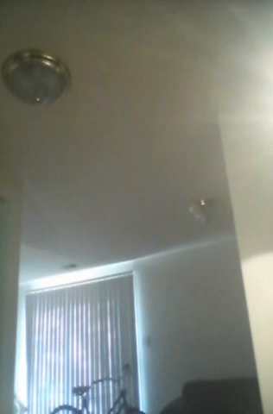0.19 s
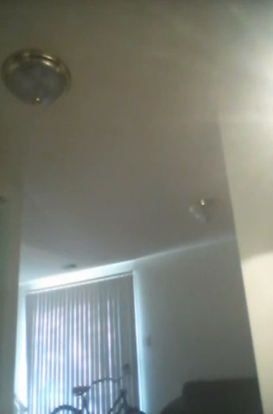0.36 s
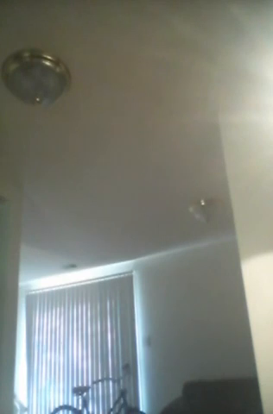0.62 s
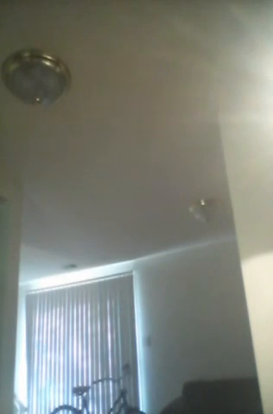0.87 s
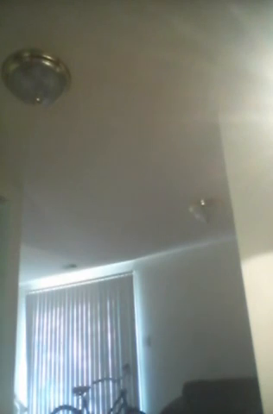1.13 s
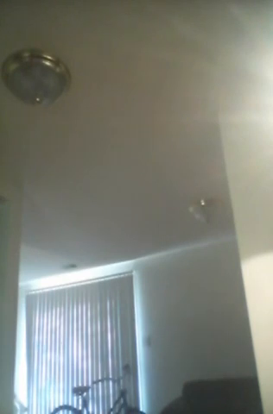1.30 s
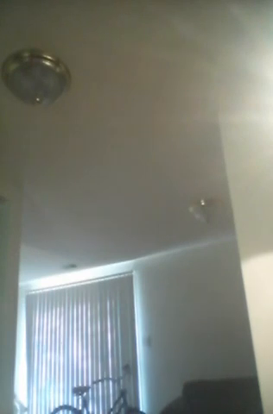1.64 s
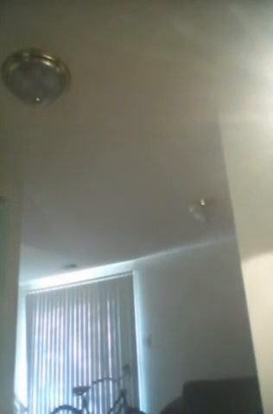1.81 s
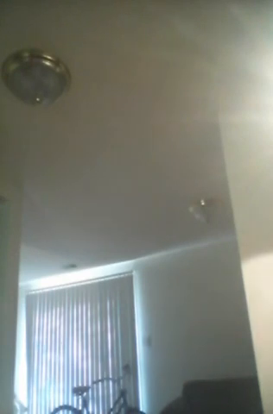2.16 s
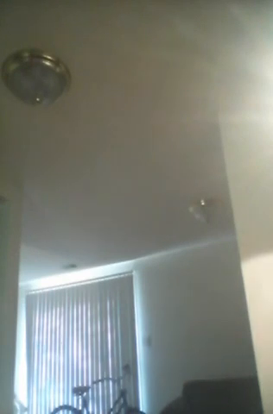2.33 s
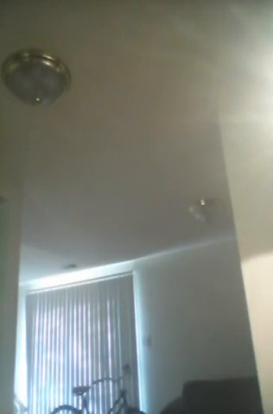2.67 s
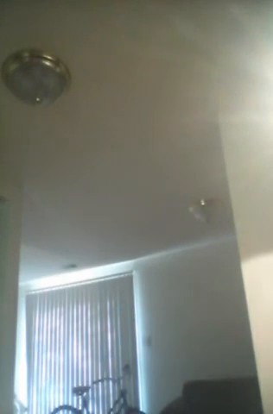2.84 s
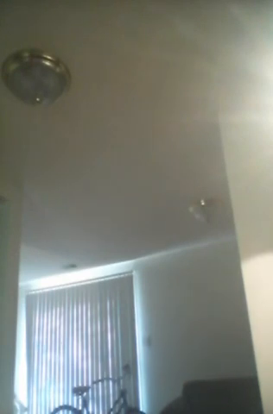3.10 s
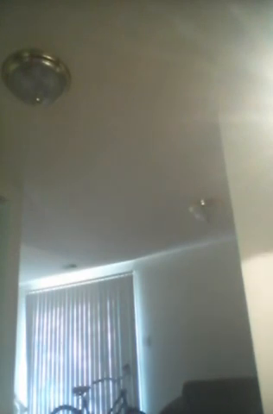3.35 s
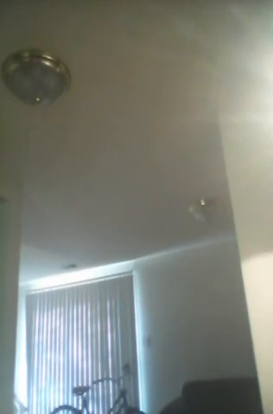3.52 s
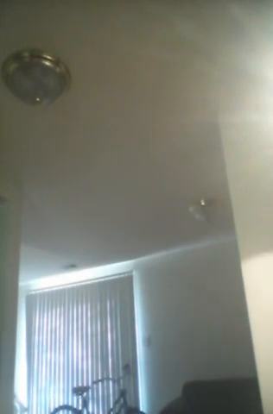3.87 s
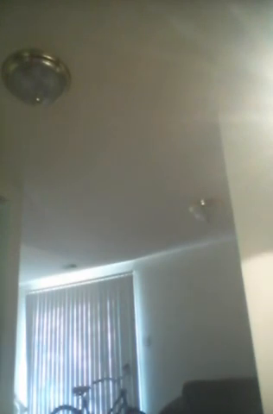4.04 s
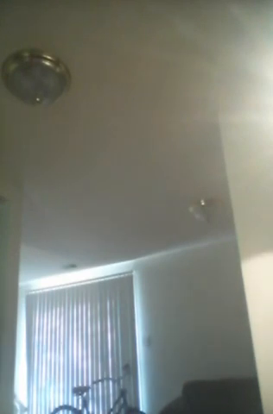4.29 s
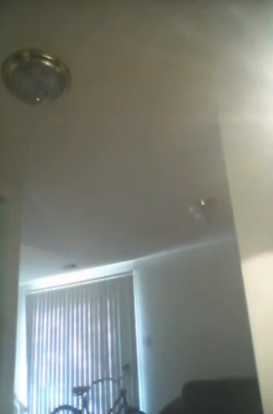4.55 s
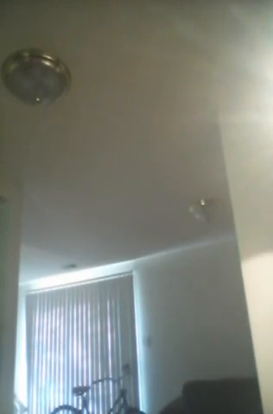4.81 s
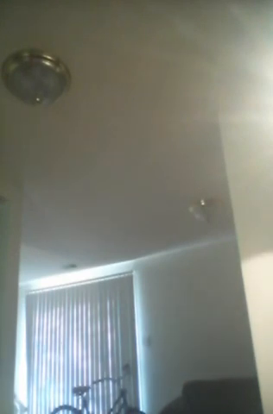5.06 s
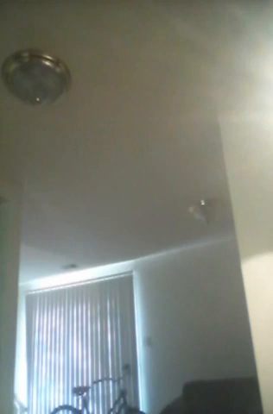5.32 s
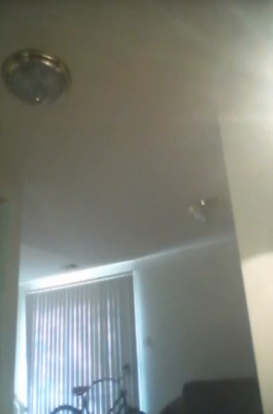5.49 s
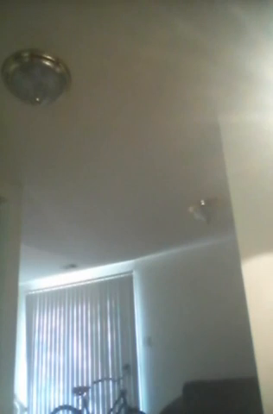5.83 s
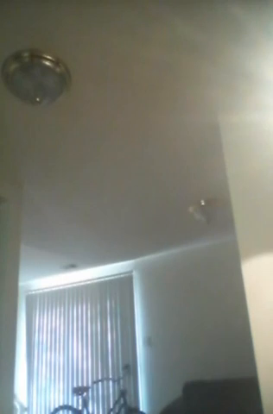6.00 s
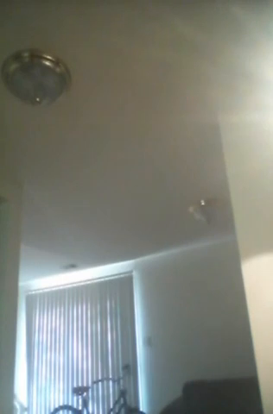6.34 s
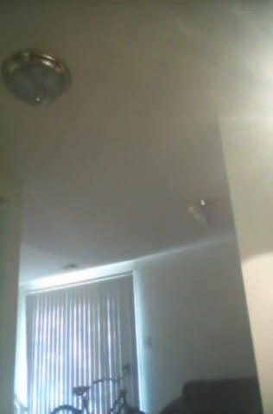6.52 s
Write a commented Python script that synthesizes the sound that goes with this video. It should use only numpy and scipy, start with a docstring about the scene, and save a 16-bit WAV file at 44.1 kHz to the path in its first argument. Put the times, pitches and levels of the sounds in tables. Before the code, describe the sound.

A microwave oven hums low and steady with fan whir and airy vent noise, while counter clicks lead to a loud double-edged thump past four seconds.

```python
"""A microwave oven hums on multiples of the mains, its fan whirs and air blows through the vent.
Small things click on the counter as filtered noise bursts; heavy thumps ring a cabinet's panel modes.
The hum and whir are wavering sines, the air and hiss are coloured noise; all sink and swell slowly.
Clicks and thumps carry a short kitchen tail, and a faint patchy high noise follows the loudness of the whole."""
import sys
import numpy as np
from scipy import signal
from scipy.fft import rfft, irfft, next_fast_len
from scipy.io import wavfile
from scipy.ndimage import uniform_filter1d, map_coordinates

SR = 44100
rng = np.random.default_rng(int(sys.argv[2]) if len(sys.argv) > 2 else 0)


def file_out(sig):
    """Save sig as 16-bit WAV at sys.argv[1]."""
    # one column per channel
    cols = np.atleast_2d(sig).T
    # limit, then scale
    lim = np.clip(cols, -1, 1)
    pcm = np.round(lim * 32767).astype(np.int16)
    wavfile.write(sys.argv[1], SR, pcm)


N = 293706
T = np.arange(N) / SR  # seconds


def amp(db):
    """Decibels to gain."""
    return 10 ** (np.asarray(db) / 20)


def unit(x):
    """Scale x to rms 1."""
    return x / np.sqrt(np.mean(x ** 2) + 1e-20)


def along(points, hz):
    """Read a curve of (Hz, value) points on a log frequency axis."""
    f, v = np.transpose(points)
    return np.interp(np.log(hz + 1), np.log(f + 1), v)


def columns(rows):
    """One value per sample for each column after the time."""
    s, *cols = np.transpose(rows)
    return [np.interp(T, s, c) for c in cols]


def wobble(rate):
    """A smooth random curve with rate knots a second."""
    knots = rng.standard_normal(int(T[-1] * rate) + 4)
    return map_coordinates(knots, [T * rate])


def filtered(x, response):
    """Multiply the spectrum of x by a complex response of frequency."""
    m = next_fast_len(x.shape[-1] + 8192)
    spectrum = rfft(x, m) * response(np.fft.rfftfreq(m, 1 / SR))
    return irfft(spectrum, m)[..., :x.shape[-1]]


def resonance(f, hz, width_hz):
    """Response of a causal resonance with top gain 1."""
    return 1j * f * width_hz / (hz * hz - f * f + 1j * f * width_hz)


def bump(f, hz, width_hz):
    """Power curve of a resonance, used as a lift in a noise colour."""
    return np.abs(resonance(f, hz, width_hz)) ** 2


def rush(response, patchy_db):
    """Coloured noise of rms 1 whose gain varies in random patches of time and frequency."""
    z = signal.stft(rng.standard_normal(N + 512), nperseg=512)[2]
    field = uniform_filter1d(rng.standard_normal(z.shape), size=5, axis=0)
    field = uniform_filter1d(field, size=8, axis=1)
    patchy = signal.istft(z * amp(patchy_db * unit(field)), nperseg=512)[1][:N]
    return unit(filtered(patchy, response))


def tones(lines, waver_db, drift, rate=2.54):
    """Sines of given (Hz, dB), each wavering in level and by drift radians in phase, rate knots a second."""
    total = 0
    for hz, db in lines:
        level = np.sqrt(2) * amp(db + waver_db * wobble(rate))
        phase = 2 * np.pi * (hz * T + rng.random()) + drift * wobble(rate)
        total = total + level * np.sin(phase)
    return total


def in_kitchen(x, wet_db):
    """A short sound with its room tail: noise in which each frequency dies at its own speed."""
    # Each row: frequency in Hz, time to fall 60 dB in s.
    decay_times = [(100, 0.58), (700, 0.37), (2000, 0.31), (6000, 0.81)]
    hz, t, z = signal.stft(rng.standard_normal(SR // 2), SR, nperseg=256)
    decay = amp(-60 * t / along(decay_times, hz)[:, None])
    tail = signal.istft(z * decay, SR, nperseg=256)[1]
    # the tail starts 150 samples late
    wet = signal.fftconvolve(x, np.pad(tail / np.linalg.norm(tail), (150, 0)))
    return np.pad(x, (0, len(wet) - len(x))) + amp(wet_db) * wet


def add(track, s, x):
    """Lay x on the track at s seconds."""
    part = track[round(s * SR):][:len(x)]
    part += x[:len(part)]


def casing_air(f):
    """Colour of the low rumble of air in the casing."""
    # Spectrum of the rumble. Each row: frequency in Hz, relative level in dB per Hz.
    rumble_colour = [(12, -53.5), (38, -36.5), (60, -22.5), (95, -0.5), (125, 1), (165, 0.5), (210, -10.5),
                     (310, -9), (380, -13), (450, -25.5), (700, -50)]
    return amp(along(rumble_colour, f))


def vent_air():
    """Air through resonances of the duct, rms near 1; the outlet resonance sinks a little with time."""
    # Duct resonances. Each row: frequency in Hz, width in Hz, level in dB relative to the outlet.
    duct_modes = [(590, 300, -20), (1340, 200, -15), (1720, 90, -17)]
    # The loudest duct resonance, high then low. Each row: frequency in Hz, width in Hz.
    outlets = [(946, 148), (910, 137)]
    # Drift to the low outlet. Each row: time in s, its share of the power (0-1).
    settling = [(0, 0.06), (3.4, 0.15), (4.8, 1), (6.66, 0.93)]

    def duct(f):
        return sum(amp(db) * bump(f, hz, w) for hz, w, db in duct_modes)

    high, low = [rush(lambda f: bump(f, hz, w) + duct(f), patchy_db=2.15) for hz, w in outlets]
    share = np.clip(np.interp(T, *np.transpose(settling)), 0, 1)
    return np.sqrt(1 - share) * high + np.sqrt(share) * low


def grille(f):
    """Colour of the hiss: a slope with a few resonant lifts."""
    # Spectrum of the hiss. Each row: frequency in Hz, relative level in dB per Hz.
    slope = [(250, -2), (500, 3.5), (650, -1.5), (1200, -7), (1600, -12.5), (2100, -7.5), (3000, -9.5),
             (3600, -10.5), (6500, -14.5), (8500, -29), (11000, -55.5)]
    # Lifts in the hiss. Each row: frequency in Hz, width in Hz, height in dB relative to the slope.
    lifts = [(1920, 84, 4.5), (2460, 97, -5.5), (2620, 130, -1.5), (2960, 150, -3)]
    return amp(along(slope, f)) * (1 + sum(amp(db) * bump(f, hz, w) for hz, w, db in lifts))


def moving_air():
    """Rumble in the casing, rush in the vent and hiss, three noise layers that sway partly together."""
    # Each row: time in s, then the levels of rumble, vent and hiss in dB before the swaying.
    air_levels = [(0, -46.5, -53, -58), (.6, -47, -57, -61), (1.5, -47.5, -53.5, -60),
                  (2.1, -50.5, -55, -61), (2.9, -47.5, -53, -61), (3.5, -51, -53, -62),
                  (4.0, -52, -58.5, -65.5), (4.9, -49.5, -56.5, -66.5), (5.5, -52.5, -55.5, -65),
                  (5.9, -50, -57, -67.5), (6.2, -52.5, -51.5, -65.5), (6.66, -51.5, -55.5, -62.5)]
    rumble_db, vent_db, hiss_db = columns(air_levels)
    eddies = wobble(8.6)  # swirls of air lift every layer together
    rumble = amp(rumble_db + 1.9 * eddies) * rush(casing_air, patchy_db=3.5)
    vent = amp(vent_db + 0.75 * eddies + 0.65 * wobble(25)) * vent_air()
    hiss = amp(hiss_db + 0.61 * eddies + 1.16 * wobble(35)) * rush(grille, patchy_db=2.1)
    return rumble + vent + hiss


def rotating_parts(hum_db):
    """Fan blades and slower shafts: unsteady sines whose level partly follows the hum."""
    # Fan blade tones. Each row: frequency in Hz, relative level in dB.
    blade_lines = [(157.5, -0.5), (220.2, -14), (315, -20.5), (472.5, -49)]
    # Slow rotating parts. Each row: frequency in Hz, relative level in dB.
    shaft_lines = [(20.2, -3.5), (47.8, -3)]
    # level in dB when the hum is at its reference; dB of change per dB of hum
    whir_ref_db, whir_follows = -50.5, 0.62
    shaft_ref_db, shaft_follows = -59.5, 0.7
    swing_db = hum_db + 40  # the reference hum is -40 dB
    whir = amp(whir_ref_db + whir_follows * swing_db) * tones(blade_lines, waver_db=1.5, drift=0.71)
    shaft = amp(shaft_ref_db + shaft_follows * swing_db) * tones(shaft_lines, waver_db=3.5, drift=0.22)
    return whir + shaft


def transformer(hum_db):
    """Casing hum, core drone and core buzz: sines on whole multiples of the mains frequency."""
    # Casing hum. Each row: multiple of the mains, relative level in dB.
    hum_lines = [(1, -27), (2, -0.5)]
    # Core drone. Each row: multiple of the mains, relative level in dB.
    drone_lines = [(3, -2.5), (4, 0)]
    # Core buzz. Each row: multiple of the mains, relative level in dB.
    buzz_lines = [(5, -15.5), (6, 2)]
    # Upper mains tones. Each row: time in s, drone level in dB, buzz level in dB.
    overtone_levels = [(0, -68, -73.5), (1.0, -69.5, -71.5), (1.6, -60.5, -59.5), (2.5, -52, -62),
                       (3.4, -56, -62), (4.0, -61.5, -68), (5.0, -59.5, -70.5), (5.9, -54.5, -66),
                       (6.66, -56.5, -68)]
    drone_db, buzz_db = columns(overtone_levels)
    mains_hz = 60.03

    def on_mains(lines):
        return [(k * mains_hz, db) for k, db in lines]

    hum = amp(hum_db) * tones(on_mains(hum_lines), waver_db=-1.2, drift=0.055)
    drone = amp(drone_db) * tones(on_mains(drone_lines), waver_db=2.5, drift=0.35, rate=8)
    buzz = amp(buzz_db) * tones(on_mains(buzz_lines), waver_db=2.5, drift=0.35, rate=8)
    return hum + drone + buzz


def oven():
    """Moving air, rotating parts and transformer; one hum curve drives the hum, whir and shafts."""
    # The hum sinks until the heaviest thumps and partly returns. Each row: time in s, hum level in dB.
    hum_level = [(0, -31.5), (.13, -29), (.6, -32.5), (.94, -32), (1.38, -33), (1.84, -38), (2.42, -35.5),
                 (2.87, -41.5), (3.22, -37.5), (3.6, -46.5), (4.12, -49.5), (4.9, -46.5), (5.13, -44.5),
                 (5.55, -41), (5.9, -39.5), (6.28, -42.5), (6.48, -41), (6.66, -41)]
    hum_db, = columns(hum_level)
    return moving_air() + rotating_parts(hum_db) + transformer(hum_db)


def clicks():
    """Each click is a snap and a short rattle in the body of the thing struck, with a brighter edge and sheen."""
    # Light clicks on the counter. Each row: start in s, peak in dB before the room, body in Hz, body width
    # in Hz, edge level in dB, edge in Hz, sheen in dB, snap in dB, rattle's time to fall 60 dB in s.
    click_rows = [(.112, -45, 1020, 785, 0, 2500, -20, 6, 0.052),
                  (0.21, -39.5, 1330, 1200, 0, 2920, -15, 9, 0.13),
                  (.27, -36, 1330, 1180, 0.5, 2900, -15.5, 7, 0.13),
                  (0.479, -28.5, 1070, 1820, -2.5, 2940, -15, 10, 0.13),
                  (2.1, -47, 1380, 300, -8, 2700, -39, 2, 0.061),
                  (2.647, -41.5, 1300, 1120, -32, 2600, -39, 12, 0.049),
                  (3.354, -16, 1390, 636, -26, 2960, -39, 19, 0.032),
                  (3.361, -23, 1370, 556, -32, 2940, -34, -2, 0.061),
                  (3.468, -33, 1460, 600, -7, 2460, -46, 14, 0.078),
                  (3.631, -21.5, 744, 790, -10, 2570, -41, 6, 0.07),
                  (3.639, -18, 700, 760, -23, 2700, -46, 21, 0.097),
                  (4.159, -53, 1725, 120.5, -31, 2620, -28.5, -1, 0.93),
                  (4.337, -24.5, 910, 710, -6, 2400, -53, 16, 0.11),
                  (5.02, -37, 1020, 384, -40, 2390, -46, -2.5, 0.25),
                  (5.063, -36, 857, 388, -41, 2400, -55, -5, 0.18),
                  (5.748, -52, 1720, 600, 5, 2680, -14, 0, 0.3),
                  (6.128, -46, 1090, 248, -34, 2580, -35, 7, 0.068),
                  (6.27, -54.5, 2720, 1020, -4, 4500, -2, 0, 0.21)]
    rise_share = 0.026  # rise time constant of a click over its rattle's 60 dB fall time
    track, t = np.zeros(N), T[:SR // 3]
    for s, db, hz, width_hz, edge_db, edge_hz, sheen_db, snap_db, t60 in click_rows:
        rise = 1 - np.exp(-t / (rise_share * t60))
        rattle = rise * amp(-60 * t / t60) * rng.standard_normal(len(t))
        rattle[0] = amp(snap_db)  # the snap is a single sample

        def struck(f):
            body = resonance(f, hz, width_hz) ** 2
            edge = amp(edge_db) * resonance(f, edge_hz, 0.24 * edge_hz) ** 2
            # the contact is too slow for the highest tones
            blunt = 1 / (1 + 1j * f / (0.95 * edge_hz)) ** 2
            sheen = amp(sheen_db) * resonance(f, 4110, 2600) ** 2
            return (body - edge) * blunt + sheen

        click = filtered(rattle, struck)
        add(track, s, in_kitchen(amp(db) * click / np.abs(click).max(), wet_db=-4.5))
    return track


def thumps():
    """Each blow rings the cabinet; the softer the contact, the fewer high modes it reaches."""
    # Heavy blows. Each row: start in s, peak of the ring in dB before the room, hardness in Hz, boom in dB.
    blows = [(0.117, -37, 403, -13), (0.477, -26.5, 600, -9), (1.947, -22.5, 130, 2),
             (1.978, -26.5, 120, 4), (2.272, -35, 89, 8), (3.358, -37.5, 450, -13),
             (4.158, -13.5, 300, -2.5), (4.341, -5.5, 460, 2), (4.385, -15.5, 305, 10.5),
             (4.461, -22.5, 197, 5.5), (4.952, -41, 204, -6), (5.062, -32.5, 183, -20),
             (5.356, -40, 148, 2), (6.633, -35.5, 513, -19)]
    # Cabinet modes. Each row: frequency in Hz, relative level in dB, time to fall 60 dB in s.
    cabinet_modes = [(57, -16.5, 0.17), (90.8, -8.5, 0.12), (127, 2.5, 0.17), (156.6, -4, 0.21),
                     (229.9, -6, 0.17), (299, -14.5, 0.18), (354, -14, 0.17), (391.7, -11.5, 0.19),
                     (518, -10.5, 0.21)]
    scatter_db = 1.4  # each blow shares its force a little differently among the modes
    track, t = np.zeros(N), T[:SR // 2]
    for s, db, hard_hz, boom_db in blows:
        ring = 0
        for k, (hz, level, t60) in enumerate(cabinet_modes):
            reach = amp(level + rng.normal(0, scatter_db)) / (1 + (hz / hard_hz) ** 4)
            reach = reach * amp(boom_db * (k < 3))  # where the blow lands sets the share of the lowest panels
            swing = 1 - np.exp(-t * hz / 0.89)  # a panel takes about a cycle to swing fully
            side = (-1) ** k  # neighbouring modes start opposed, so the boom peaks on their first beat
            ring = ring + side * reach * swing * amp(-60 * t / t60) * np.sin(2 * np.pi * hz * t)
        # loose parts shake
        shake = (1 - np.exp(-t / 0.0011)) * amp(-60 * t / 0.34) * rng.standard_normal(len(t))
        shake = filtered(shake, lambda f: resonance(f, hard_hz, hard_hz) ** 2)
        blow = ring / np.abs(ring).max() + amp(-19) * shake / np.abs(shake).max()
        add(track, s, in_kitchen(amp(db) * blow, wet_db=-3.0))
    return track


def scene():
    """Oven, clicks and thumps at one microphone."""
    return (oven() + clicks() + thumps())[None]


def record(dry):
    """A faint, patchy high noise rises and falls with the sound; nothing above the band limit is kept."""
    # level of the following noise under sound at full scale in dB; dB of change per dB of sound
    noise_db, noise_follows = -67, 0.3
    average_s, top_hz = 0.08, 13900  # averaging time of the loudness; band limit
    power = uniform_filter1d(dry ** 2, size=round(average_s * SR))
    loud_db = 10 * np.log10(np.abs(power) + 1e-9)
    noise_level = amp(noise_db + noise_follows * loud_db + 0.6 * wobble(12))
    noise = noise_level * rush(lambda f: f / (f + 3000), patchy_db=5.5)
    return filtered(dry + noise, lambda hz: hz < top_hz)


dry = scene()
out = record(dry)
file_out(out)
```